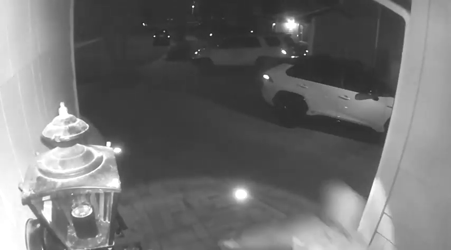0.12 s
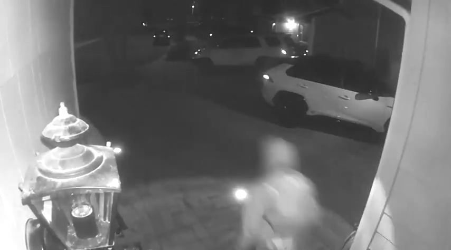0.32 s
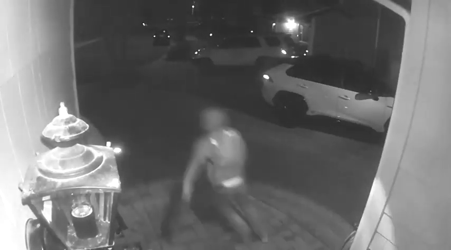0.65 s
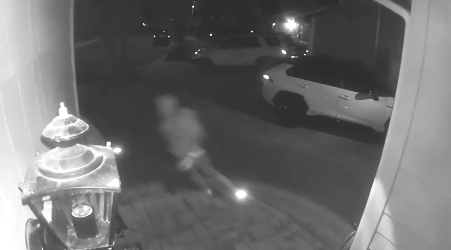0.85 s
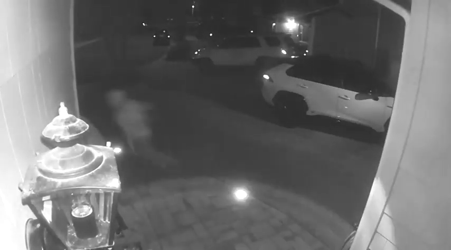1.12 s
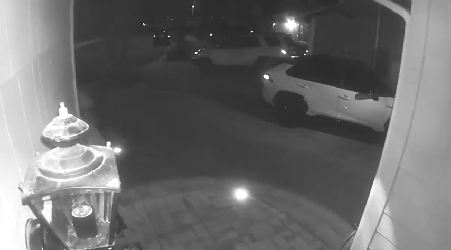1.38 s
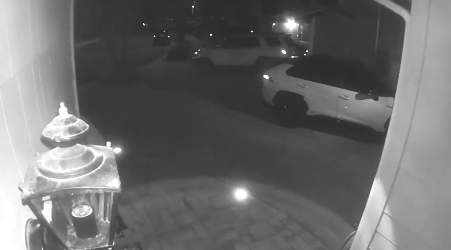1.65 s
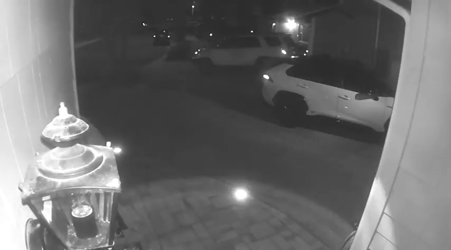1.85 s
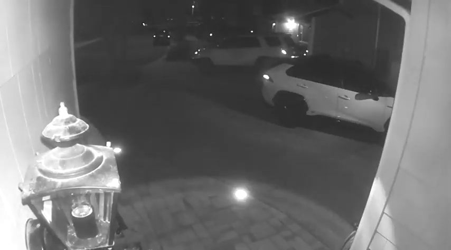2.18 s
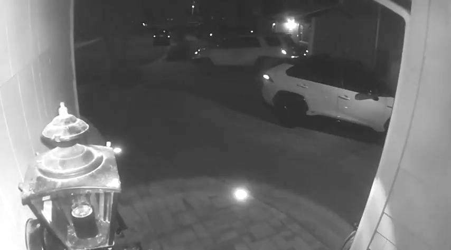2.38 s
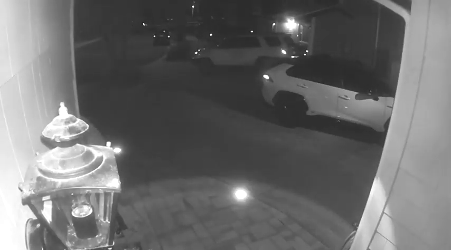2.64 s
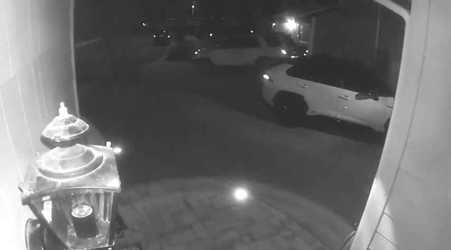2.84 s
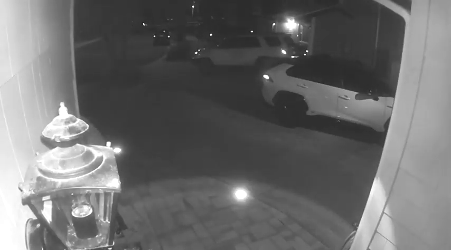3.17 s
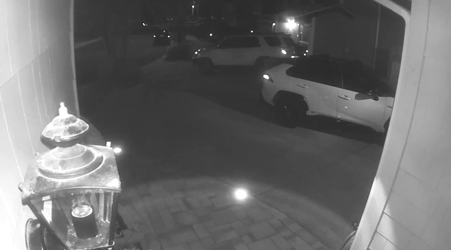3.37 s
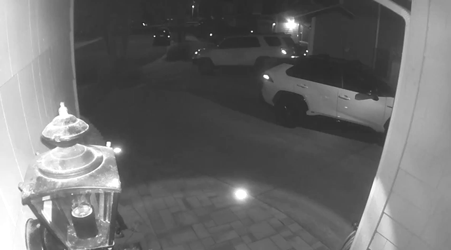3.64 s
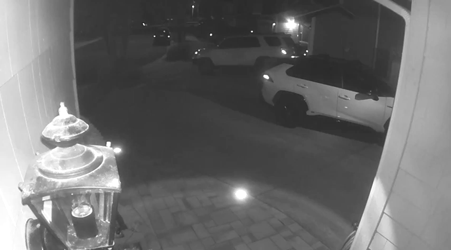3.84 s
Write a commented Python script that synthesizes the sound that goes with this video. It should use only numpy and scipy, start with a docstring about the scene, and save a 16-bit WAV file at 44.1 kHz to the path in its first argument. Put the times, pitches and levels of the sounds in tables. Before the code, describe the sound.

A loud door slam dies away and someone runs off over pavement, clothes swishing.

```python
"""Night, beside a small door camera. A door has just slammed: its low boom overloads the microphone
and dies away, leaving faint street air and hum. Someone runs off over paving and asphalt: clothes
swish between the strides, soles pop and grate, and the pops echo in the porch and street.
A faint whine rises under the first steps; a few low swells follow.
From 2.3 s, far scuffs come back from the house fronts."""
import sys
import numpy as np
from scipy import signal
from scipy.fft import rfft, irfft
from scipy.io import wavfile
from scipy.ndimage import uniform_filter1d

SR = 44100
rng = np.random.default_rng(int(sys.argv[2]) if len(sys.argv) > 2 else 0)


def dump_mix(stems):
    """Bounce the given channels to the path in sys.argv[1] as a 16-bit WAV at rate SR."""
    frames = np.atleast_2d(stems).T  # one column per channel
    limited = np.clip(frames, -1, 1)  # hard clip at full scale
    pcm = np.round(limited * 32767).astype(np.int16)
    wavfile.write(sys.argv[1], SR, pcm)


N = 176400
GRAIN_DB = 1  # rms unevenness of rubbing and rattling


def amp(db):
    """Decibels to gain."""
    return 10 ** (np.asarray(db) / 20)


def clock():
    """Sample times in s."""
    return np.arange(N) / SR


def unit_rms(x):
    """Scale to rms 1."""
    return x / np.sqrt(np.mean(x ** 2) + 1e-20)


def jitter(samples):
    """Moving average of white noise, rms 1."""
    return unit_rms(uniform_filter1d(rng.standard_normal(N), size=samples))


def log_interp(points, hz):
    """Table lookup on a log-frequency axis."""
    table_hz, value = np.transpose(points)
    return np.interp(np.log(hz + 1), np.log(table_hz), value)


def noise(colour, grain_db=0):
    """Noise of rms 1, filtered by colour(hz); grain_db clumps it into millisecond grains."""
    white = amp(grain_db * jitter(50)) * rng.standard_normal(N)
    return unit_rms(irfft(rfft(white) * colour(np.fft.rfftfreq(N, 1 / SR)), N))


def shaped(spectrum):
    """Colour from a spectrum table."""
    return lambda hz: amp(log_interp(spectrum, hz))


def band(centre_hz, sigma_oct, floor=0):
    """Colour of one Gaussian band above a flat floor."""
    return lambda hz: np.exp(-.5 * (np.log2((hz + 1) / centre_hz) / sigma_oct) ** 2) + floor


def swell(peak_s, rise_s, fall_s):
    """Exponential rise to a peak, exponential fall."""
    t = clock() - peak_s
    return np.exp(-np.maximum(-t / rise_s, t / fall_s))


def strike(age_s, decay_s, attack_s=.002):
    """Linear attack, exponential decay."""
    return np.minimum(age_s / attack_s, 1) * np.exp(-age_s / decay_s)


def glide(track, waver):
    """Sine along a pitch and level track; waver is the rms jitter as a share of pitch."""
    t = clock()
    time_s, pitch_hz, level_db = np.transpose(track)
    hz = np.interp(t, time_s, pitch_hz) * (1 + waver * jitter(300))
    level = amp(np.interp(t, time_s, level_db, -np.inf, -np.inf))
    return level * np.sqrt(2) * np.sin(2 * np.pi * np.cumsum(hz) / SR)


# Door and porch modes: pitch_hz, level_db, t60_s
DOOR_MODES = [(31.6, -36.5, 2.2), (50.8, -5.5, 0.57), (77.2, -6.5, 0.46), (97.95, 7, .11),
              (115.86, 3.5, 0.26), (140.8, 6, 0.19), (169.6, -5.5, 0.31), (333.3, -17, .2),
              (432, -12.5, .16), (592, -26, 0.21), (788, -23.5, .1)]
# Rattle spectrum: freq_hz, relative_db
RATTLE_SPECTRUM = [(100, -18), (300, 9), (600, 2.5), (1300, -3), (2100, 0), (2700, -6.5), (5000, -7.5),
                   (8000, -24)]
# Panel shudder: time_s, pitch_hz, level_db
SHUDDER_TRACK = [(.125, 174.4, -43), (.175, 155.4, -18.5), (.215, 150, -37.5), (.265, 136.8, -41.5),
                 (.38, 133.7, -46), (.46, 138.2, -66.5)]


def door(slam_age_s=.00578, rattle_db=-28, rattle_fade_db_per_s=111):
    """Low modes ring on from the slam, the fittings rattle, the panel shudders with sagging pitch."""
    t = clock() + slam_age_s
    boom = sum(amp(db - 60 * t / t60_s) * np.sin(2 * np.pi * hz * t) for hz, db, t60_s in DOOR_MODES)
    shudder = glide(SHUDDER_TRACK, waver=.046)
    rattle = amp(rattle_db - rattle_fade_db_per_s * t) * noise(shaped(RATTLE_SPECTRUM), GRAIN_DB)
    return boom + shudder + rattle


# Night air spectrum: freq_hz, relative_db
AIR_SPECTRUM = [(15, -31.5), (28, -5.5), (55, -3), (95, -9), (200, -8.5), (272, -14.5), (421, -13),
                (578, -11.5), (738, -18), (1300, -19), (2100, -17.5), (3000, -23), (5000, -23),
                (7280, -19.5), (8420, -33.5)]


def night_air(air_db=-61, fade_db_per_s=1, hum_db=-69.5, hum_hz=151.7):
    """Slowly fading broadband air and a wavering hum of narrowband noise."""
    air = amp(air_db - fade_db_per_s * clock()) * noise(shaped(AIR_SPECTRUM))
    hum = amp(hum_db) * noise(band(hum_hz, sigma_oct=.07))
    return air + hum


# Fabric rub spectrum: freq_hz, relative_db
CLOTH_SPECTRUM = [(200, -11.5), (600, -18.5), (1300, -13), (2200, -4), (3400, -5), (5200, -5.5),
                  (6800, -6.5), (8200, -18.5)]
# Clothing swishes: peak_s, level_db, rise_s, fall_s, hiss_hz
CLOTH_SWISHES = [(0.188, -40.5, 0.0082, 0.03, 5100), (0.539, -50, 0.024, 0.03, 1940),
                 (0.63, -44, .006, 0.022, 2340), (0.673, -47, .02, 0.02, 5570),
                 (0.85, -47.5, 0.02, 0.039, 5100), (0.901, -48, .02, 0.018, 6000),
                 (1.033, -39, 0.007, 0.049, 4600), (1.061, -35.5, 0.0049, 0.0047, 5200),
                 (1.105, -44.5, .025, 0.014, 4700), (1.152, -36, 0.02, 0.027, 5100),
                 (1.397, -41, 0.013, 0.021, 4700), (1.595, -52, .012, 0.023, 4160),
                 (1.628, -47.5, 0.0016, 0.017, 3600), (1.651, -41.5, .0018, 0.011, 3900),
                 (1.69, -54, 0.056, 0.044, 3750), (1.916, -52.5, .014, 0.053, 5100),
                 (2.03, -59.5, 0.021, .03, 5200)]


def clothes(rustle_db=-51, fade_db_per_s=7.67, hiss_share=.46):
    """Fabric rustles, fading with distance; each limb swing adds a broad rub and a narrower hiss."""
    rub = noise(shaped(CLOTH_SPECTRUM), GRAIN_DB)
    rub_power = amp(rustle_db - fade_db_per_s * clock()) ** 2
    hiss = np.zeros(N)
    for peak_s, level_db, rise_s, fall_s, hiss_hz in CLOTH_SWISHES:
        level = amp(level_db) * swell(peak_s, rise_s, fall_s)
        rub_power += (1 - hiss_share) * level ** 2
        hiss += np.sqrt(hiss_share) * level * noise(band(hiss_hz, sigma_oct=.32), GRAIN_DB)
    return np.sqrt(rub_power) * rub + hiss


# Sole thud spectrum: freq_hz, relative_db
THUD_SPECTRUM = [(100, -8.5), (250, -9), (420, 4.5), (700, -1), (1200, -3), (1900, -17), (3500, -31),
                 (8000, -60)]
# Road grit spectrum, also under the scuffs: freq_hz, relative_db
GRIT_SPECTRUM = [(200, -48), (900, 0), (1600, -4.5), (2100, 0), (2700, 0.5), (3600, -1.5), (5200, 2.5),
                 (8000, -14)]
# Footfalls: start_s, pop_db, pop_hz, pop_rise_s, tick_db, thud_db, grit_db, grit_decay_s
FOOTFALLS = [ (0.3841, -19.5, 1890, 0.00089, -25, -41, -36.5, 0.037),
             (0.7362, -32, 1721, 0.0006, -48, -43, -63, 0.018),
             (0.99, -44.5, 284, 0.004, -49, -51, -46, 0.052),
             (1.23, -30, 546, 0.004, -33, -43.5, -49.5, 0.097),
             (1.5022, -32, 1044, 0.0011, -46, -50, -48, 0.06),
             (1.7502, -44, 630, 0.0016, -49, -51, -66, 0.074),
             (2.010, -59.5, 360, 0.0048, -62, -62.5, -74, 0.024),
             (2.543, -47.5, 507, 0.0027, -42.5, -48.5, -47.5, 0.062),
             (2.722, -51, 574, 0.0029, -60, -55, -62.5, 0.097),
             (2.959, -60, 520, 0.00095, -68, -64, -67, .07), (3.821, -63, 880, 0.0013, -67, -64, -72, .04)]


def footfalls(tick_decay_s=.00069, thud_decay_s=.033):
    """Each sole ticks and pops on the ground, then thuds and grates. Returns (pops, crunch)."""
    thud = noise(shaped(THUD_SPECTRUM))
    grit = noise(shaped(GRIT_SPECTRUM), GRAIN_DB)
    pops, crunch = np.zeros(N), np.zeros(N)
    for start_s, pop_db, pop_hz, pop_rise_s, tick_db, thud_db, grit_db, grit_decay_s in FOOTFALLS:
        age_s = np.maximum(clock() - start_s, 0)
        pulse = age_s / pop_rise_s * np.exp((1 - (age_s / pop_rise_s) ** 2) / 2)
        pops += amp(pop_db) * pulse * np.sin(2 * np.pi * pop_hz * age_s)
        pops += amp(tick_db) * (age_s > 0) * np.exp(-age_s / tick_decay_s) * grit
        crunch += amp(thud_db) * strike(age_s, thud_decay_s) * thud
        crunch += amp(grit_db) * strike(age_s, grit_decay_s) * grit
    return pops, crunch


# Porch reflections: delay_s, gain
PORCH_ECHOES = [(.0032, 0.28), (.0085, 0.39), (.0118, 0.26), (.030, .14), (.038, 0.049)]
# Street reverberation: freq_hz, t60_s
STREET_DECAY = [(200, 0.34), (600, .2), (2000, 0.29), (8000, 0.21)]


def street_echo(source, wet_db=-7, wet_db_per_s=3):
    """Porch reflections and a diffuse tail whose share grows as the runner gets farther away."""
    t = clock()
    early = sum(gain * np.interp(t - delay_s, t, source, 0) for delay_s, gain in PORCH_ECHOES)
    hz, age_s, spectra = signal.stft(rng.standard_normal(SR), SR, nperseg=256)
    t60_s = log_interp(STREET_DECAY, hz)[:, None]
    tail = signal.istft(spectra * amp(-60 * age_s / t60_s), SR)[1]
    send = source * amp(wet_db + wet_db_per_s * t)
    return early + signal.fftconvolve(send, tail / np.linalg.norm(tail))[:N]


# Faint whine: time_s, pitch_hz, level_db
WHINE_TRACK = [(.49, 547, -74), (.53, 596, -61), (0.591, 668, -62), (.64, 675, -68), (.72, 667, -70),
               (0.779, 704, -97)]


def whine():
    """A brief, unsteady rising tone."""
    return glide(WHINE_TRACK, waver=.065)


# Low swells: peak_s, level_db, rise_s, fall_s, centre_hz
LOW_SWELLS = [(1.06, -56.5, 0.054, 0.034, 68), (1.57, -54.5, 0.044, 0.02, 58),
              (3.06, -63, 0.082, 0.089, 58), (3.06, -68, 0.13, 0.12, 254), (3.215, -50, 0.03, 0.087, 145.6),
              (3.3, -62, .02, 0.039, 120), (3.681, -62.5, 0.017, 0.016, 313)]


def low_swells():
    """Narrow bands of low noise grow and die away."""
    return sum(amp(level_db) * swell(peak_s, rise_s, fall_s) * noise(band(centre_hz, sigma_oct=.14))
               for peak_s, level_db, rise_s, fall_s, centre_hz in LOW_SWELLS)


# Distant sole scuffs: peak_s, scrape_db, rise_s, fall_s, centre_hz, grit_db
FAR_SCUFFS = [(2.309, -62.5, 0.024, 0.044, 1850, -55.5), (2.401, -53, 0.0024, .015, 1990, -71),
              (2.438, -51, 0.024, 0.041, 1870, -57.5), (2.594, -69, 0.019, 0.039, 910, -50),
              (2.769, -56.5, 0.033, 0.03, 1250, -60), (3.0, -64, .015, 0.018, 2000, -61),
              (3.079, -57.5, 0.038, .02, 1910, -60), (3.335, -66, .02, 0.088, 1720, -62.5),
              (3.359, -51, 0.001, 0.0075, 1950, -58), (3.49, -77, 0.017, 0.015, 2220, -68),
              (3.685, -70, 0.055, 0.043, 1750, -60), (3.86, -63.5, .03, 0.084, 1303, -69.5)]


def scuffs():
    """Soles scrape the gritty road farther off."""
    grit = noise(shaped(GRIT_SPECTRUM), GRAIN_DB)
    out = np.zeros(N)
    for peak_s, scrape_db, rise_s, fall_s, centre_hz, grit_db in FAR_SCUFFS:
        scrape = noise(band(centre_hz, sigma_oct=.36, floor=amp(-28)), GRAIN_DB)
        out += swell(peak_s, rise_s, fall_s) * (amp(scrape_db) * scrape + amp(grit_db) * grit)
    return out


def scene():
    """Mono mix of door, runner and night background."""
    pops, crunch = footfalls()
    slam = door()
    runner = pops + street_echo(pops) + crunch + clothes() + scuffs()
    return (slam + runner + night_air() + low_swells() + whine())[None]


def record(dry):
    """The small microphone rings in its port and overloads; a low-pass follows."""
    port_hz, port_width_hz, port_gain = 2080, 130, .4
    clip_level, cutoff_hz = .41, 8550
    port = signal.iirpeak(port_hz, port_hz / port_width_hz, SR)
    heard = dry + port_gain * signal.lfilter(*port, dry)
    clipped = heard / (1 + (heard / clip_level) ** 12) ** (1 / 12)
    lowpass = signal.firwin(201, cutoff_hz, window=("kaiser", 9), fs=SR)
    return signal.oaconvolve(clipped, lowpass[None], "same")


dry = scene()
out = record(dry)
dump_mix(out)
```